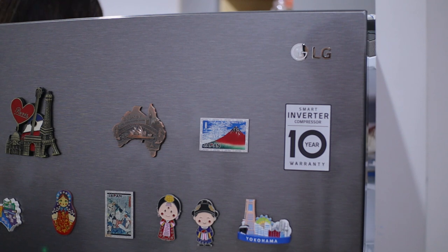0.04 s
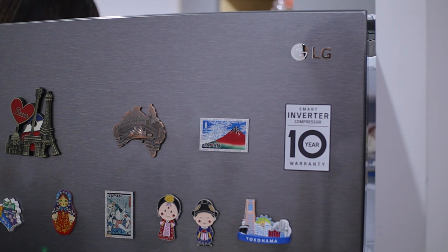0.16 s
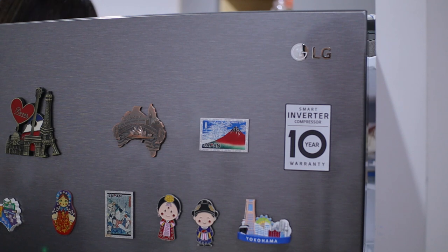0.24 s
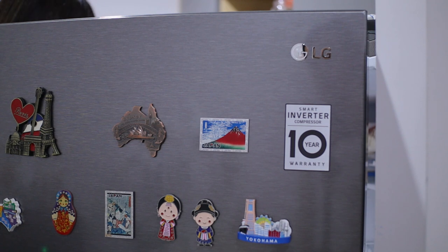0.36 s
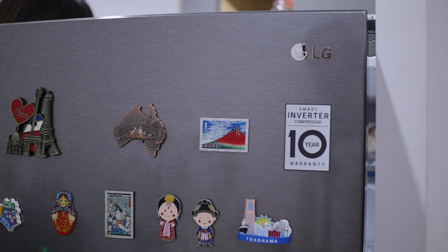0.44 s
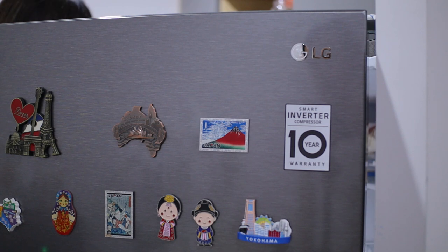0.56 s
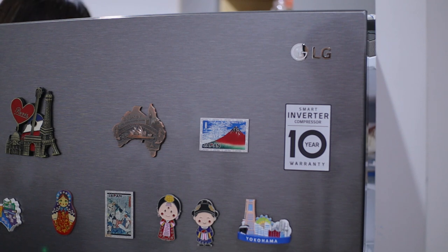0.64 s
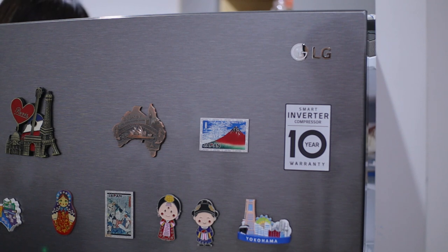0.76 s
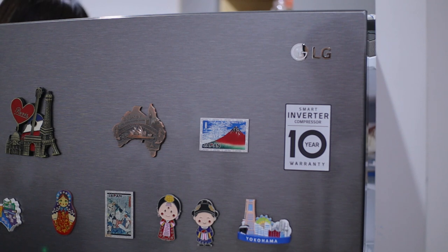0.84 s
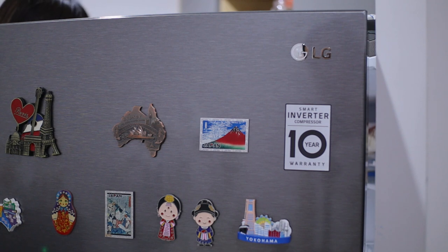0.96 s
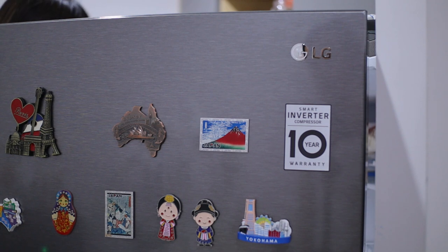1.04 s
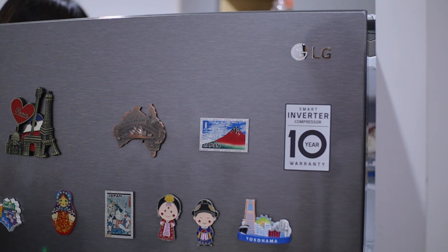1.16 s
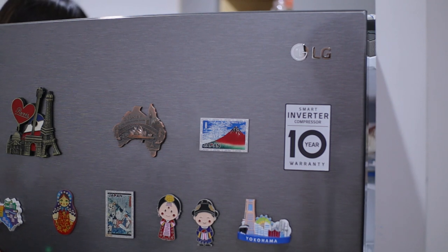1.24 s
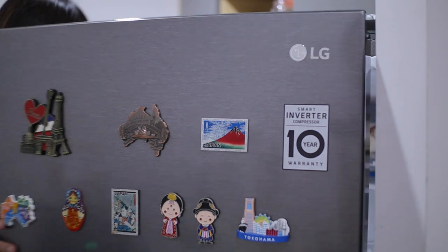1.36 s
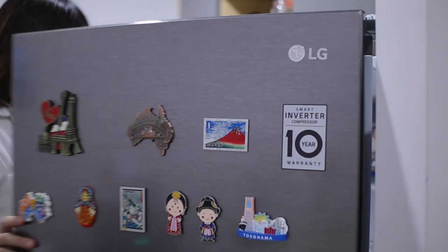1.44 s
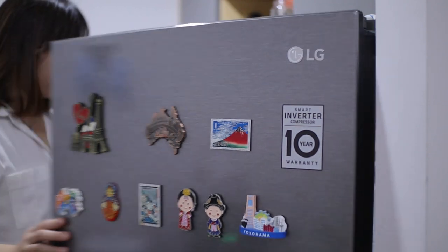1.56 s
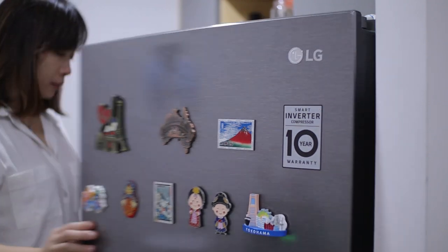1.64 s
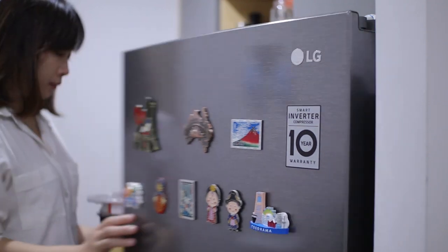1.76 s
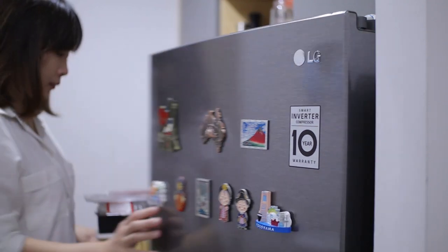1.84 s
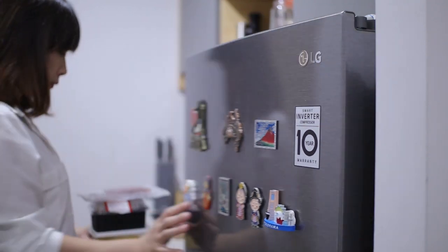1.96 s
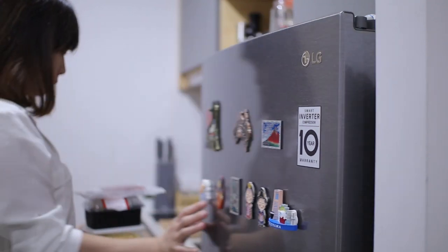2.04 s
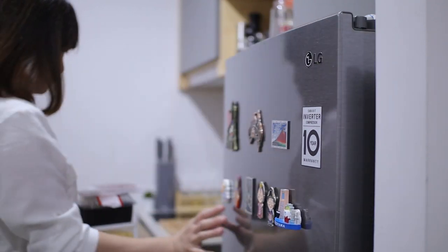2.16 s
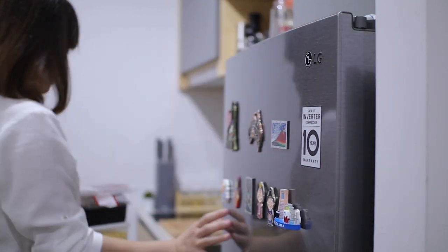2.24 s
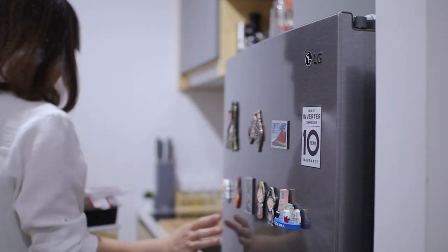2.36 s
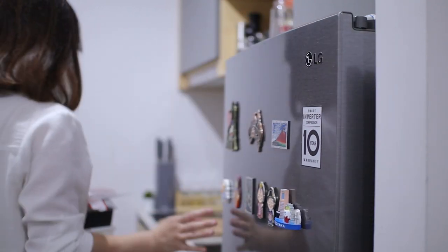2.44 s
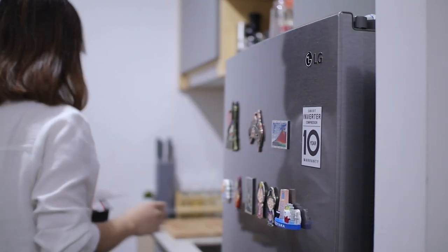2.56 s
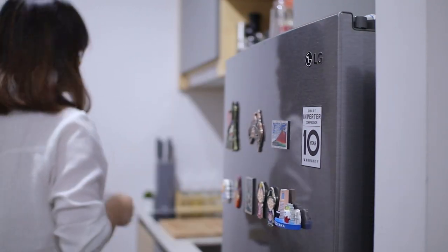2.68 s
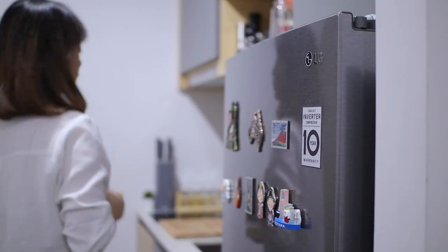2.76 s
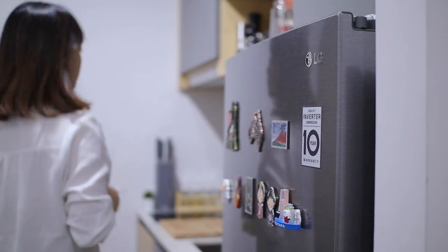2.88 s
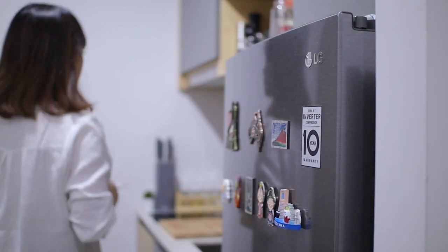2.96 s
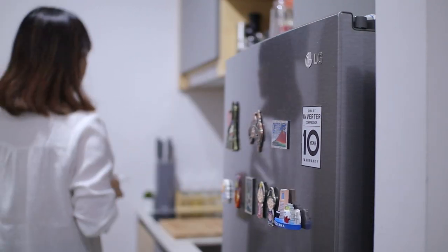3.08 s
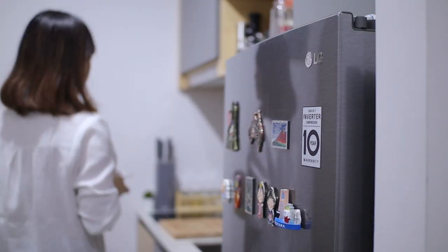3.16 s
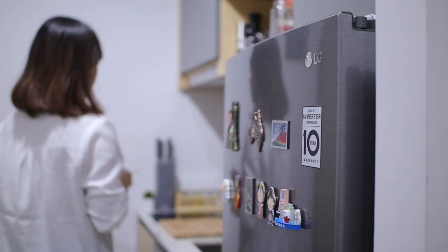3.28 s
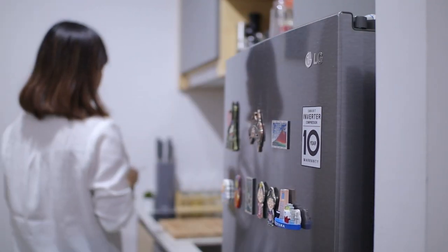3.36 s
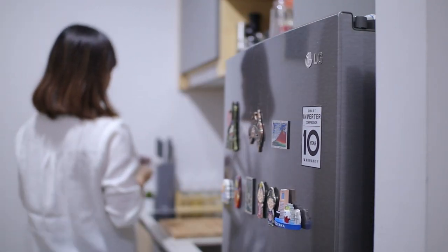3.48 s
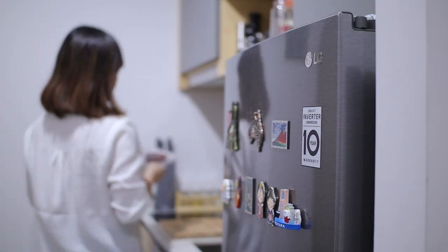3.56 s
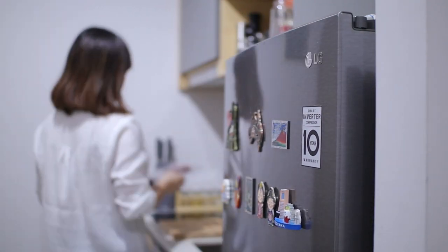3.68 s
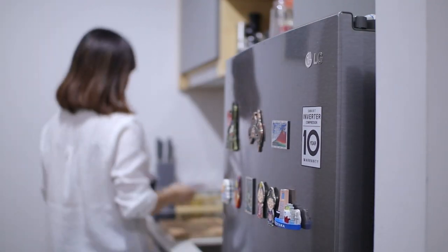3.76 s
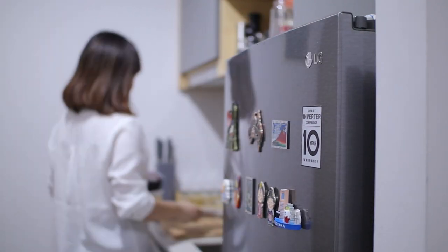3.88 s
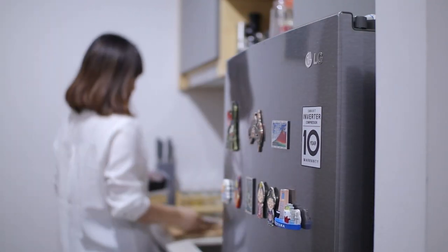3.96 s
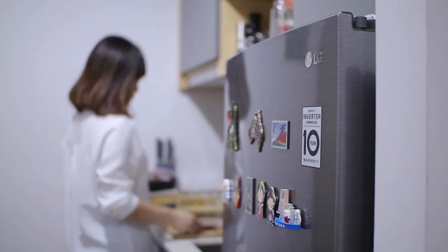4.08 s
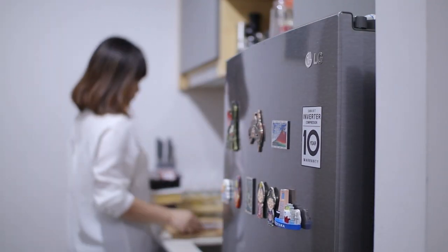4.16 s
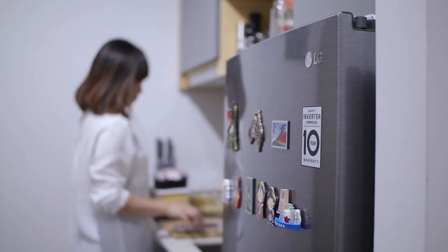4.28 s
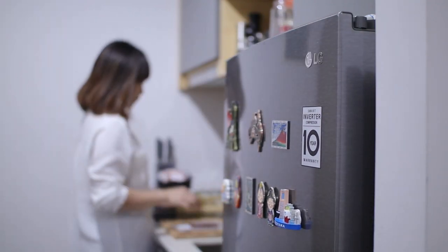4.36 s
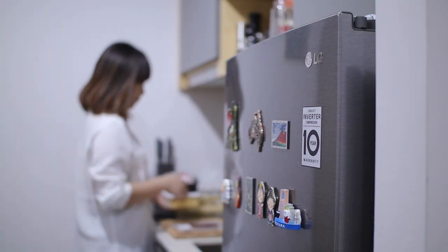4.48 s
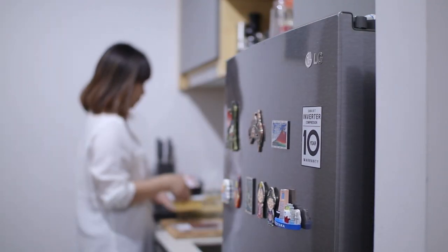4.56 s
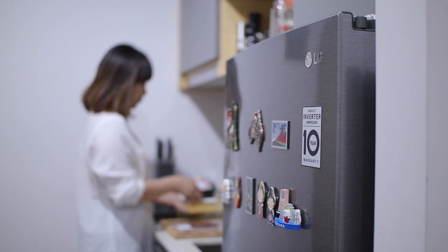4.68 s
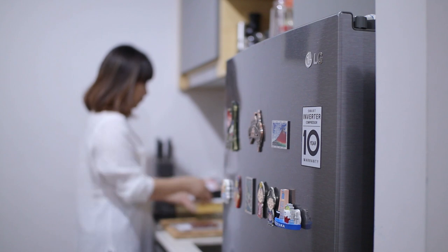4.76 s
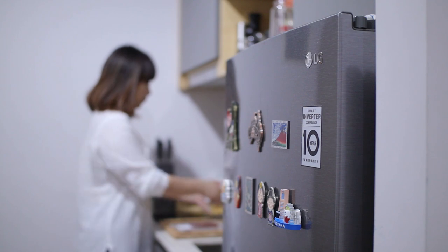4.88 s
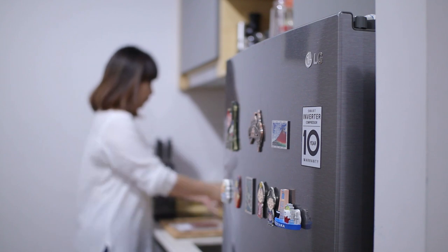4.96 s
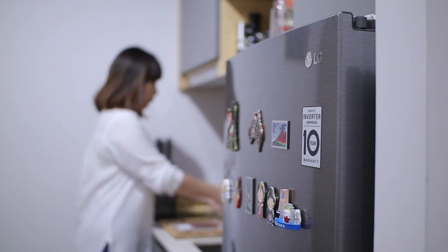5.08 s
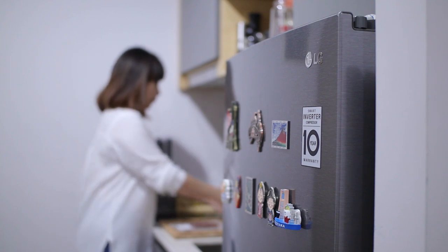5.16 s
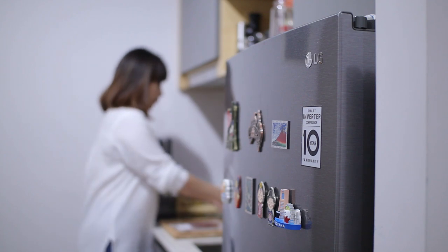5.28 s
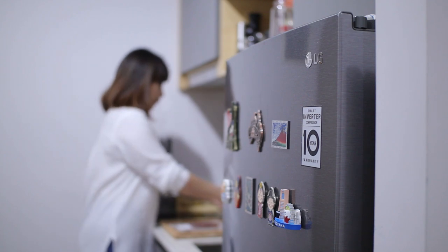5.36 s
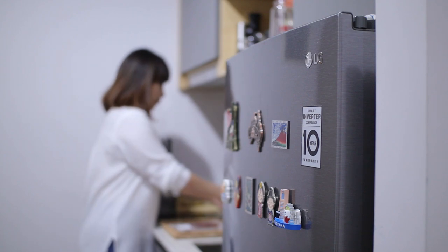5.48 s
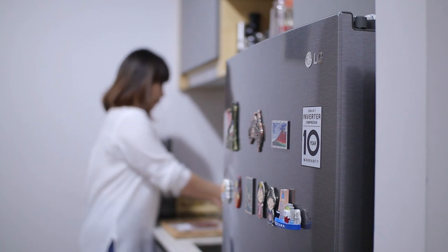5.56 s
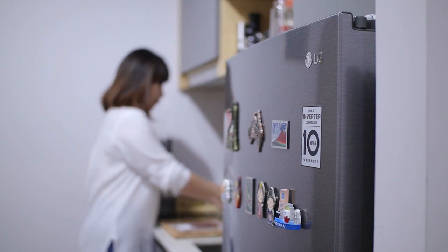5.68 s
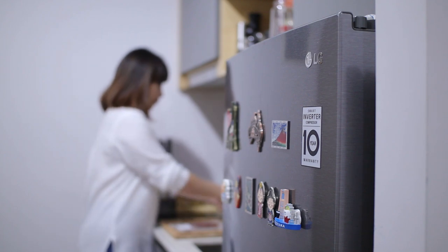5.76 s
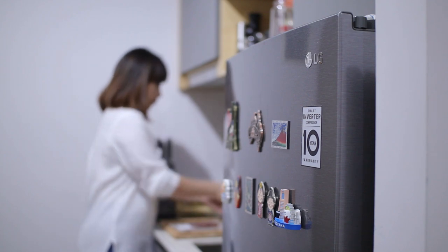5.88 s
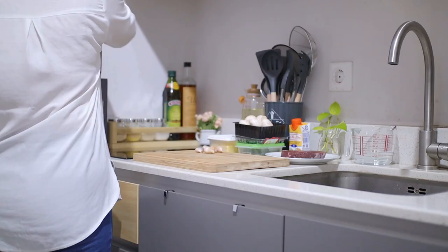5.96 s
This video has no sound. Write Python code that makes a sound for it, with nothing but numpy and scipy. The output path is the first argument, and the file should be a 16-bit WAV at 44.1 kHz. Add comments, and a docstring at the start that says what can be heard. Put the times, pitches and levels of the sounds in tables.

```python
"""A refrigerator door is pushed shut in a small, hard-walled kitchen: the cabinet booms, the door racks rattle.
Plastic boxes are taken out; a jar and a box knock in the refrigerator, later a utensil and a board on the
wooden worktop, each a few clicks and the ring of its body. Small ticks and taps are short resonant clicks;
sleeves and packaging rub as grainy, coloured noise. Behind lie hiss, the appliance's drone and a faint whine.
A stereo microphone hears the action a little to its left; the background is wide in the treble."""
import sys
import numpy as np
from scipy import signal
from scipy.fft import rfft, irfft
from scipy.io import wavfile

SR = 44100
rng = np.random.default_rng(int(sys.argv[2]) if len(sys.argv) > 2 else 0)


def wav_record(signal):
    """Record a signal, one row per channel, as 16-bit PCM in the file named by sys.argv[1]."""
    frames = np.transpose(np.atleast_2d(signal))
    bounded = np.clip(frames, -1, 1)
    # unit amplitude maps onto the largest positive 16-bit level
    quanta = np.round(bounded * 32767).astype(np.int16)
    wavfile.write(sys.argv[1], SR, quanta)


N = 265614
TIME = np.arange(N) / SR
HZ = np.fft.rfftfreq(N, 1 / SR)

# reverberation of the kitchen: f/Hz, t60/s
ROOM_T60 = [(60, 0.67), (250, 0.35), (700, 0.45), (1500, 0.38), (4000, 0.33), (8000, 0.32), (13000, 0.24)]
# colour of rubbed sleeves and wrapping: f/Hz, relative level/dB per Hz
RUSTLE_SPECTRUM = [(500, -26), (1200, -5.5), (1750, 1), (2800, -4), (4200, -3), (7000, -10), (10300, -9),
                   (12000, -16.5), (14000, -36)]


def door():
    """The gasket lands and drives the cabinet's modes inwards; racks and bottles clatter and ring with each jolt."""
    # door meeting the cabinet, then its racks jolting: t/s, thud level/dB, clatter level/dB
    blows = [(2.2715, -27.5, -33.5), (2.2815, -54, -30.5), (2.2856, -24.5, -39.5), (2.2951, -32, -42.5),
             (2.3142, -34.5, -60), (2.3516, -51, -60), (2.3644, -51, -51.5)]
    # cabinet and door panels: f/Hz, relative level/dB, t60/s
    cabinet_modes = [(28.6, -10.5, 1), (50.7, -1, 0.84), (77.5, 5, 0.18), (124.7, 0.5, 0.37),
                     (155, 9, 0.12), (173, 5, 0.1), (229.5, 6.5, 0.21), (287, 0, 0.21), (297, -5.5, 0.24),
                     (350, -17, 0.53), (412, -5, 0.16), (468, -20, 0.39), (564, -8.5, 0.12)]
    # colour of the racks' contact noise: f/Hz, relative level/dB per Hz
    rack_spectrum = [(310, -18.5), (520, 0.5), (566, -4), (651, -7), (839, -3), (993, -8.5), (1370, -4.5),
                     (1770, -5.5), (2340, -9.5), (2580, -8.5), (2980, -12), (4540, -13.5), (8430, -25),
                     (9980, -20), (15000, -52)]
    # shelves and bottles in the door: f/Hz, relative level/dB, t60/s
    rack_modes = [(703, -6, 0.18), (744, -3, 0.23), (1275, 0, 0.16), (1357, 4, .16), (1816, -2.5, 0.13),
                  (1922, -1, 0.15), (2830, -4, .12), (3752, -4.5, 0.18), (4590, -5, .12)]
    rack_ring_db = -7.5  # re the clatter

    out = np.zeros((2, N))
    rack_click = contact(rack_spectrum)
    rack_ring = struck(rack_modes, room_db=-3.5)
    for s, thud_db, clatter_db in blows:
        thud = -struck(cabinet_modes, room_db=-5)  # inwards: negative pressure first
        clatter = kitchen(rack_click, direct_db=-2.5, chatter_s=0.0048)
        add(out, s, thud_db, thud)
        add(out, s, clatter_db, clatter)
        add(out, s, clatter_db + rack_ring_db, rack_ring)
    return out


def knocks():
    """Each thing lands in a few quick touches, and its body rings from the first."""
    # jar and box in the refrigerator, then utensil and board on the worktop: t/s, what, edge level/dB,
    # falls flat after/s, landing level/dB, loss per bounce/dB, ring level/dB, straight path re the room/dB
    landed = [(0.5947, "jar", -45, 0.0063, -40, 8, -53, -7),
              (1.3099, "box", -40.5, .015, -43.5, 16, -41, -1.5),
              (4.0439, "utensil", -43, 0.0063, -47, 10, -60, -5),
              (5.331, "board", -40, .0051, -33.5, 5.5, -34, -3),
              (5.6076, "board", -45.5, 0.0035, -36, 17, -55, -3)]
    # colour of each thing's contact noise: f/Hz, relative level/dB per Hz
    jar_spectrum = [(120, -9.5), (200, -6), (318, -5.5), (400, -10), (670, -13.5), (759, -5), (1010, -17.5),
                    (1320, -13.5), (1520, -17), (2020, -20), (2280, -20), (10200, -35), (14000, -55)]
    box_spectrum = [(88, -40), (150, -7), (241, 2), (309, -5), (451, -9), (515, 0), (611, -6.5), (782, -2),
                    (945, -12), (1060, -8), (1410, -15.5), (1740, -8), (4160, -29.5), (8230, -29.5),
                    (11000, -35), (15000, -60)]
    utensil_spectrum = [(120, -33), (200, -1), (285, -5), (772, -6), (922, -9.5), (1010, -7), (2540, -10.5),
                        (2880, -9.5), (3820, -17.5), (4570, -16), (7790, -28), (10300, -27), (14000, -54)]
    board_spectrum = [(120, -36), (200, -12), (312, 1), (504, -3), (732, 0), (990, -10), (1080, -5),
                      (1660, -4), (1810, -13.5), (2540, -17), (2680, -23), (2830, -22), (6640, -34),
                      (10300, -32.5), (15000, -60)]
    # ringing of jar, plastic box, utensil and chopping board: f/Hz, relative level/dB, t60/s
    jar_modes = [(320, 1, 0.17), (550, -3, 0.18), (770, 0, .2), (1324, -6, .15), (1990, -6, .15),
                 (3467, -1, .15)]
    box_modes = [(218, 2.5, 0.073), (654, 1, 0.13), (765, -4, 0.18), (1720, 1.5, .04), (1800, 0, .04),
                 (1916, -8, .08), (2150, -11, .09), (2490, -1, .05), (2745, -5.5, .06)]
    utensil_modes = [(840, -2, .15), (994, 0, .15), (2780, -4, .2), (3180, -9, .15), (4450, -7, .15)]
    board_modes = [(332, 2, 0.43), (440, -8, 0.17), (530, -21, .15), (740, -21, 0.087), (1112, 8, 0.26),
                   (1192, 7.5, 0.18), (1230, 7, 0.21), (1366, 3, 0.35), (1450, 3, 0.41), (1490, -22, .15),
                   (1630, -19, 0.22), (1726, 10, 0.14)]
    things = {
        "jar": (jar_spectrum, jar_modes),
        "box": (box_spectrum, box_modes),
        "utensil": (utensil_spectrum, utensil_modes),
        "board": (board_spectrum, board_modes),
    }

    out = np.zeros((2, N))
    for s, what, edge_db, flat_s, landing_db, loss_db, ring_db, direct_db in landed:
        spectrum, modes = things[what]
        click = contact(spectrum)
        for delay, db in touches(edge_db, flat_s, landing_db, loss_db, bounces=2):
            add(out, s + delay, db, kitchen(click, direct_db, chatter_s=0.0051))
        add(out, s, ring_db, struck(modes, room_db=-7.5))
    return out


def touches(edge_db, flat_s, landing_db, loss_db, bounces):
    """(delay s, dB) of a thing set down: an edge, the landing, then ever shorter and weaker bounces."""
    first_hop_s, next_hop_share = 0.009, 0.9
    hop_lengths = first_hop_s * next_hop_share ** np.arange(bounces)
    since_landing = np.append(0, np.cumsum(hop_lengths))
    landings = [(flat_s + hop, landing_db - loss_db * k) for k, hop in enumerate(since_landing)]
    return [(0, edge_db)] + landings


def ticks(top_hz=11500):
    """Small ticks and taps, each a click with one broad resonance, dull at the very top."""
    # plastic snaps, a jar's ring, the door's hinge and contents shifting:
    # t/s, level/dB, centre f/Hz, distance from the centre to -6 dB/octaves
    taps = [(.022, -56, 8000, 2), (.028, -56.5, 4420, 0.19), (.033, -52, 8700, 2.2),
            (0.3726, -67, 3260, 0.62), (.631, -50, 1990, 0.57), (.775, -73.5, 9000, 1),
            (0.8316, -67.5, 4500, .13), (1.531, -67, 6500, 4.1), (1.5902, -68, 5000, 3.6),
            (1.873, -65.5, 3600, 0.61), (1.968, -56.5, 2300, 0.28), (2.022, -57, 680, 0.44),
            (2.058, -53.5, 230, 0.32), (2.975, -62, 6500, 8.9), (3.0497, -61, 6500, 8.4),
            (3.184, -72, 4000, 3.4), (4.283, -59.5, 2170, 0.66), (4.632, -55, 1270, 1),
            (4.735, -61.5, 3300, .85), (5.757, -67.5, 4470, .92)]
    out = np.zeros((2, N))
    hz = np.geomspace(50, SR / 2, 200)
    for s, db, centre_hz, octaves in taps:
        resonance = 1 + (np.log2(hz / centre_hz) / octaves) ** 2
        dulling = 1 + (hz / top_hz) ** 12
        bell_db = -20 * np.log10(resonance * dulling)
        click = contact(np.column_stack([hz, bell_db]))
        add(out, s, db, kitchen(click, direct_db=-3.0, chatter_s=0.0063))
    return out


def rubbing():
    """Cloth and wrapping rustle and crinkle with each movement; boxes slide in short strokes."""
    # movements that rub sleeves and wrapping: start t/s, length/s, level/dB
    movements = [(-.05, 0.38, -68), (.7, 0.12, -74.5), (2.9, 0.86, -68.5), (3.61, 0.035, -60.5),
                 (4.12, 0.13, -62), (4.48, 0.19, -60), (4.68, 0.078, -63.5), (4.79, 0.24, -69),
                 (5.8, 0.069, -70.5)]
    # things slid over the worktop: start t/s, length/s, level/dB
    slides = [(3.385, 0.074, -60.5), (4.16, 0.042, -55.5), (4.295, .065, -56.5), (5.822, 0.031, -49.5),
              (5.86, 0.048, -48.5)]
    # colour of the sliding: f/Hz, relative level/dB per Hz
    slide_spectrum = [(300, -22), (500, -12.5), (830, 4), (1130, -7), (1350, -5), (1560, -2.5),
                      (1750, -7.5), (2150, -4), (2900, -12.5), (5000, -22), (10000, -30), (14000, -50)]
    rest_db = -75.5  # cloth never lies quite still

    moving = strokes(movements, attack_s=0.023, release_s=0.037)
    rustle_level = np.hypot(moving, from_db(rest_db))
    slide_level = strokes(slides, attack_s=0.022, release_s=0.0062)
    rustle = friction(rustle_level, RUSTLE_SPECTRUM, grain_db=3.5)
    slide = friction(slide_level, slide_spectrum, grain_db=1.5)
    return rustle + crinkles(rustle_level) + slide


def strokes(rows, attack_s, release_s):
    """Gain of rubbing over time: each stroke speeds up, holds and dies away; strokes add in power."""
    power = 1e-18
    for s, length, db in rows:
        rise = np.clip((TIME - s) / attack_s, 0, 1)
        fall = np.exp(-np.maximum(TIME - s - length, 0) / release_s)
        power = power + (from_db(db) * rise * fall) ** 2
    return np.sqrt(power)


def friction(level, spectrum, grain_db):
    """Countless tiny slips of uneven size; the room lets their power linger."""
    sizes = from_db(grain_db * np.minimum(rng.exponential(1, N), 6))
    colour = from_db(at_hz(spectrum, HZ))
    keep = from_db(-120 / (SR * at_hz(ROOM_T60, 6000)))  # share of power left after one sample
    lingering = np.sqrt(signal.lfilter([1 - keep], [1, -keep], level ** 2))
    straight = level * tinted(sizes * rng.standard_normal((2, N)), colour)
    reflected = lingering * tinted(rng.standard_normal((2, N)), colour)
    return (straight + reflected) / np.sqrt(2)


def crinkles(level):
    """Wrapping snaps at random, as strongly as it is being rubbed."""
    snaps_per_s, greatest_db = 20, -6  # greatest level re the rustle
    born = rng.random(N) < snaps_per_s / SR
    clicks = born * level * rng.uniform(-0.85, 1, N)
    snap = np.zeros((2, SR))
    add(snap, 0, greatest_db, kitchen(contact(RUSTLE_SPECTRUM), direct_db=-1.0, chatter_s=0.003))
    return signal.fftconvolve(clicks[None], snap, axes=1)[:, :N]


def background(waver_hz=5, flutter_db=2):
    """Steady hiss, a low drone, mains hum and the thin, wavering whine of the inverter with its octave."""
    # steady hiss with its low rumble: f/Hz, relative level/dB per Hz
    hiss_spectrum = [(15, -22), (25, -19), (45, -1), (72, -11), (125, -4), (170, -7), (270, -8.5),
                     (430, -12.5), (700, -14.5), (1500, -24.5), (3400, -33.5), (5000, -41), (11000, -51.5),
                     (13500, -69)]
    # low resonances in the appliance's drone: f/Hz, level/dB, distance to half amplitude/Hz
    drone_humps = [(49, -61.5, 10.4), (99.8, -65.5, 9), (148.7, -66, 10), (193.5, -66, 5.3),
                   (260.4, -61.5, 11.4), (363, -70.5, 6.3)]
    # mains hum: f/Hz, level/dB
    mains_tones = [(50, -60), (100, -55)]
    # inverter whine: t/s, level/dB
    whine_level = [(0, -82), (1.35, -83), (1.6, -80), (2.9, -78.5), (4, -77.5), (4.5, -82), (6, -81)]
    hiss_db, whine_hz = -53, 4350

    hiss = from_db(hiss_db) * tinted(rng.standard_normal((2, N)), from_db(at_hz(hiss_spectrum, HZ)))

    humps = 0
    for hz, db, width in drone_humps:
        humps = humps + from_db(db) * energy_one(1 / (1 + ((HZ - hz) / width) ** 2))
    drone = np.sqrt(np.sum(humps ** 2)) * tinted(rng.standard_normal(N), humps)

    mains = 0
    for hz, db in mains_tones:
        mains = mains + np.sqrt(2) * from_db(db) * np.sin(2 * np.pi * (hz * TIME + rng.random()))

    # slow random drifts of pitch and level
    waver, flutter = tinted(rng.standard_normal((2, N)), 1 / (1 + (HZ / 20) ** 2))
    phase = 2 * np.pi * np.cumsum(whine_hz + waver_hz * waver) / SR
    tone = np.sqrt(2) * (np.sin(phase) + from_db(-15) * np.sin(2 * phase))
    whine = gain_curve(whine_level) * from_db(flutter_db * flutter) * tone
    return hiss + whine + np.outer([1, 0], drone + mains)  # long waves are the same at both ports


def contact(spectrum, size=4096):
    """The shortest causal click that has this spectrum: its minimum-phase form, by way of the cepstrum."""
    magnitude = from_db(at_hz(spectrum, np.fft.rfftfreq(size, 1 / SR)))
    cepstrum = irfft(np.log(magnitude))
    cepstrum[1:size // 2] *= 2
    cepstrum[size // 2 + 1:] = 0
    return energy_one(irfft(np.exp(rfft(cepstrum))))


def ringing(modes):
    """Decaying sines of a struck body."""
    t = TIME[:SR]
    tones = 0
    for hz, db, t60 in modes:
        decay = np.exp(-np.log(1000) * t / t60)
        tones = tones + from_db(db) * decay * np.sin(2 * np.pi * hz * t)
    return energy_one(tones)


def struck(modes, room_db):
    """Mid and side of a ringing body: its tones arrive straight, the room smears them."""
    tones = ringing(modes)
    smeared = []
    for _ in range(2):
        tail = room_tail(build_s=0.0019)
        smeared.append(energy_one(signal.fftconvolve(tones, tail)[:SR]))
    out = from_db(room_db) * np.array(smeared)
    out[0] += tones
    return out


def kitchen(click, direct_db, chatter_s, uneven_db=2.5):
    """Mid and side of one touch: brief chatter of the surfaces, then uneven clumps of reflections all round."""
    size = 32768
    t = TIME[:size]
    knots = np.arange(0, size, SR // 400)
    unevenness = np.interp(np.arange(size), knots, rng.standard_normal(len(knots)))
    clumps = from_db(uneven_db * unevenness * np.exp(-t / 0.072))  # the tail smooths out later
    paths = []
    for tail in (room_tail(build_s=0.0018), room_tail(build_s=0.0034)):
        chatter = energy_one(rng.standard_normal(size) * np.exp(-t / chatter_s))
        response = energy_one(tail * clumps) + from_db(direct_db) * chatter
        paths.append(energy_one(signal.fftconvolve(click, response)))
    return np.array(paths)


def room_tail(build_s, size=32768):
    """Dense reflections that build up quickly and die band by band."""
    t, hz = TIME[:size], np.fft.rfftfreq(size, 1 / SR)
    white = rfft(rng.standard_normal(size))
    edges = np.append(0, np.geomspace(130, SR / 2, 12))
    build = 1 - np.exp(-t / build_s)
    out = 0
    for low, high in zip(edges, edges[1:]):
        t60 = at_hz(ROOM_T60, (low + high) / 2)
        fade = build * np.exp(-np.log(1000) * t / t60)
        band = irfft(white * (hz >= low) * (hz < high))
        out = out + np.sqrt(high - low) * energy_one(band * fade)
    return energy_one(out)


def microphone(mid_side, width, left_lead, lean_db):
    """The side signal grows with frequency; sound from the left reaches that port a little earlier."""
    mid, side = rfft(mid_side)
    turned = (side + 1j * left_lead * mid) / np.hypot(1, left_lead)  # a quarter-cycle lead of the mid
    side = from_db(at_hz(width, HZ)) * turned
    left = (mid + side) * from_db(lean_db / 2)
    right = (mid - side) * from_db(-lean_db / 2)
    return irfft(np.array([left, right]), N)


def from_db(db):
    """Decibels to gain."""
    return 10 ** (np.asarray(db) / 20)


def rms_one(x):
    """Scale to unit rms."""
    return x / np.sqrt(np.mean(x ** 2) + 1e-20)


def energy_one(x):
    """Scale to unit energy."""
    return x / np.sqrt(np.sum(x ** 2) + 1e-20)


def at_hz(points, hz):
    """Read a table on a log-frequency axis."""
    f, value = np.transpose(points)
    return np.interp(np.log(np.maximum(hz, 1)), np.log(f), value)


def gain_curve(rows):
    """Gain over time from (t/s, level/dB) rows."""
    return from_db(np.interp(TIME, *np.transpose(rows)))


def tinted(x, gain):
    """Give a steady sound a spectrum; rms 1."""
    return rms_one(irfft(rfft(x) * gain, N))


def add(track, s, db, sound):
    """Place a unit-energy sound; its level is the rms it would have over 40 ms."""
    start = int(s * SR)
    part = sound[..., :N - start] * np.sqrt(0.04 * SR)
    track[..., start:start + part.shape[-1]] += from_db(db) * part


def scene():
    """The action is a little to the left of the microphone; the background spreads evenly to both channels."""
    # side minus mid, for things in front of the microphone: f/Hz, level/dB
    action_width = [(35, -49), (90, -47), (180, -27), (350, -13), (700, -10.5), (1400, -4), (2800, 2.5),
                    (5600, 4.5), (12000, 6)]
    # side minus mid for the background, hiss unrelated in the two channels, wide in the treble: f/Hz, level/dB
    background_width = [(50, -24), (110, -15), (200, -11), (400, -4.5), (700, -3.5), (1100, 1), (2000, 4.5),
                        (4000, 5.5), (8000, 8)]
    # left minus right, for the action: f/Hz, level/dB
    lean = [(150, 0), (700, 1), (1500, 1.9), (2600, 0), (4300, 2.9), (6000, 1), (8000, 1.2), (11000, -.4)]
    sources = door() + knocks() + ticks() + rubbing()
    action = microphone(sources, action_width, left_lead=0.39, lean_db=at_hz(lean, HZ))
    return action + microphone(background(), background_width, left_lead=0, lean_db=0)


def record(dry):
    """The deepest bass is thinned and the top is cut steeply."""
    bass_hz, cutoff_hz = 18, 15100
    thinning = signal.butter(1, bass_hz, "high", fs=SR, output="sos")
    top_cut = signal.ellip(10, 0.1, 80, cutoff_hz, fs=SR, output="sos")
    return signal.sosfilt(top_cut, signal.sosfilt(thinning, dry))


dry = scene()
out = record(dry)
wav_record(out)
```